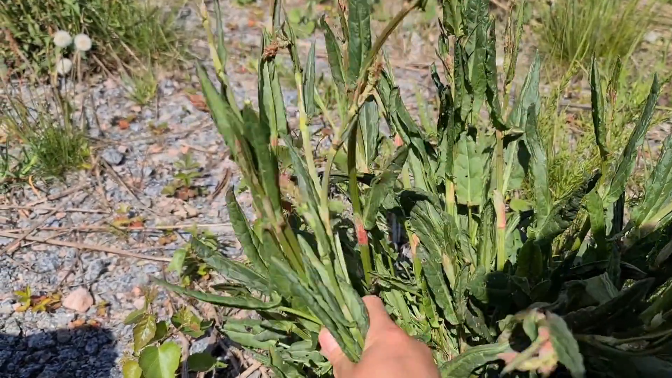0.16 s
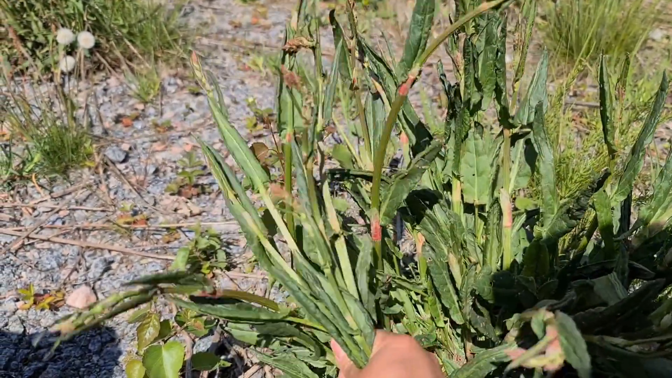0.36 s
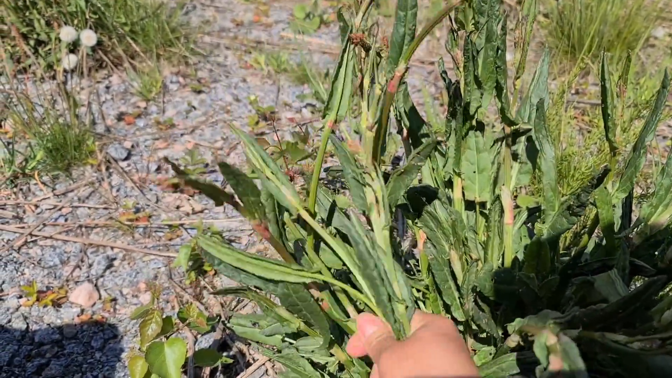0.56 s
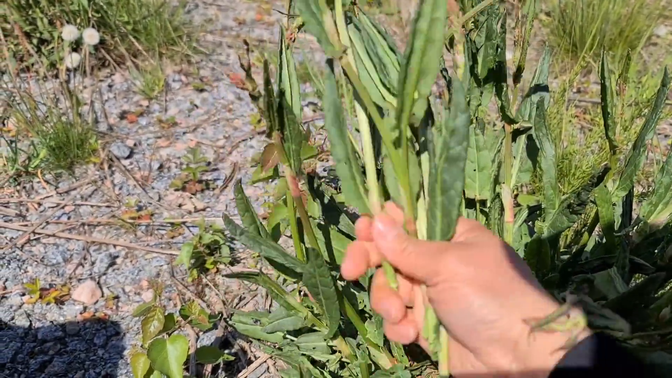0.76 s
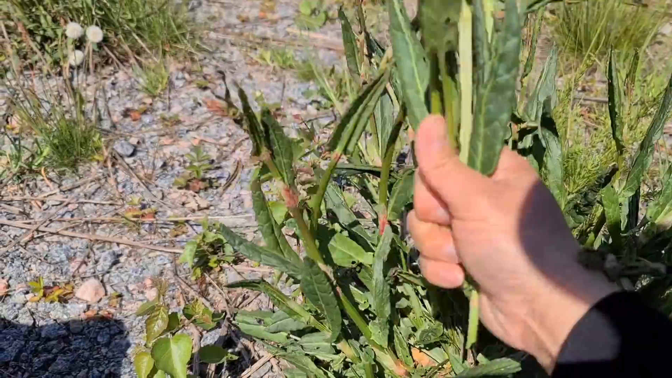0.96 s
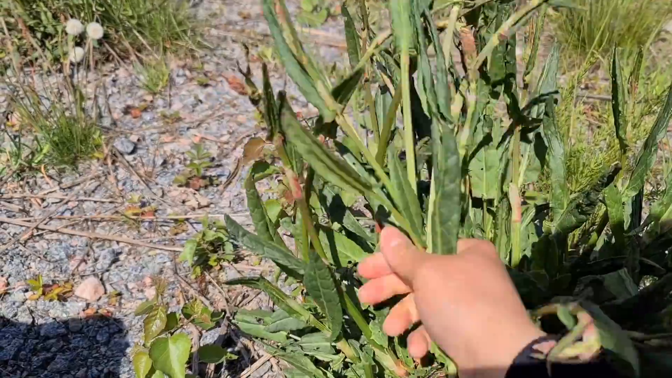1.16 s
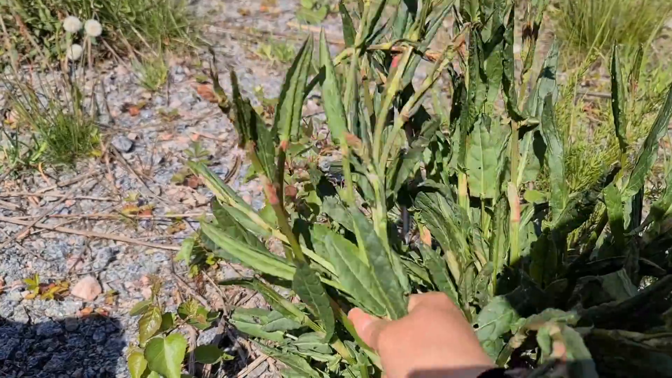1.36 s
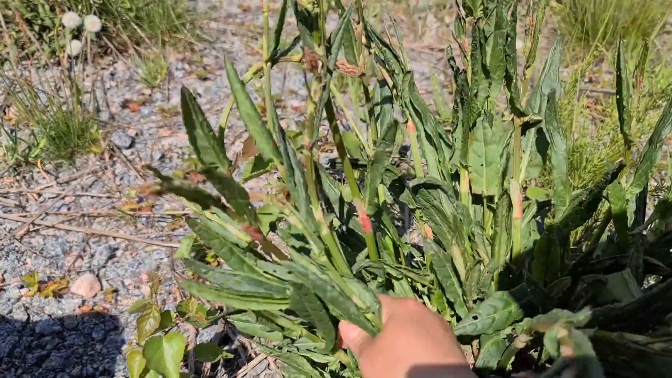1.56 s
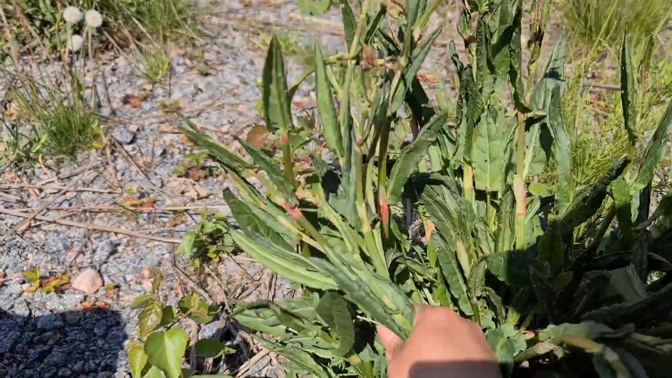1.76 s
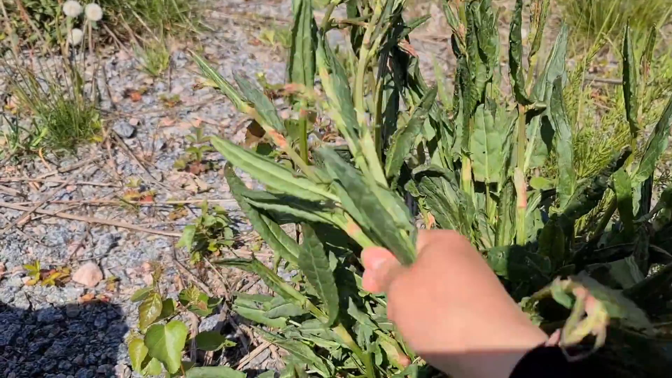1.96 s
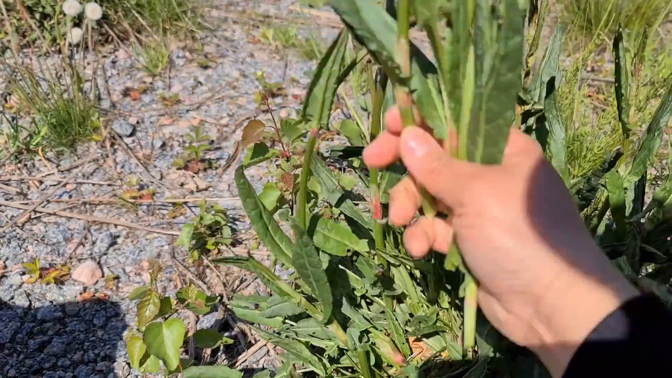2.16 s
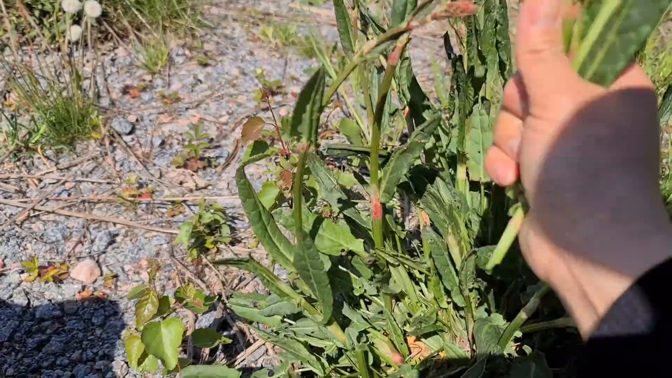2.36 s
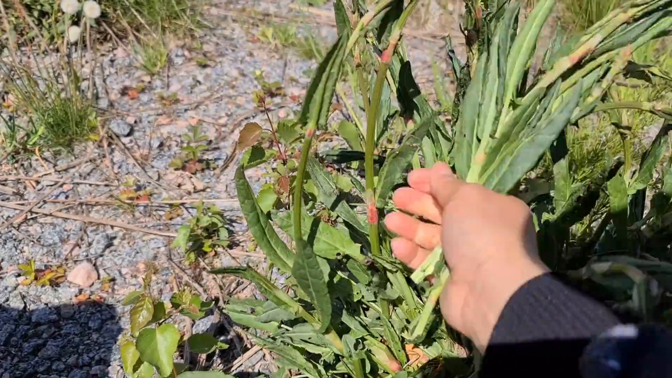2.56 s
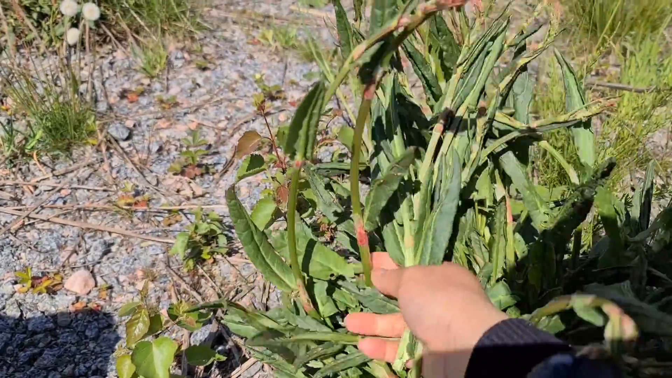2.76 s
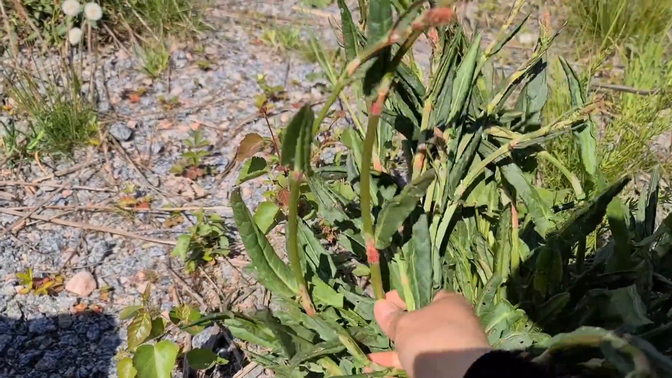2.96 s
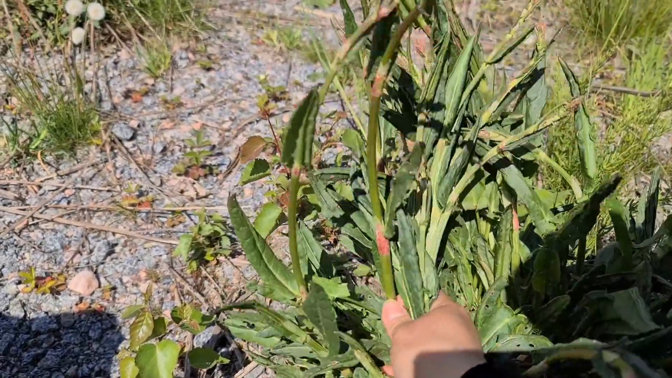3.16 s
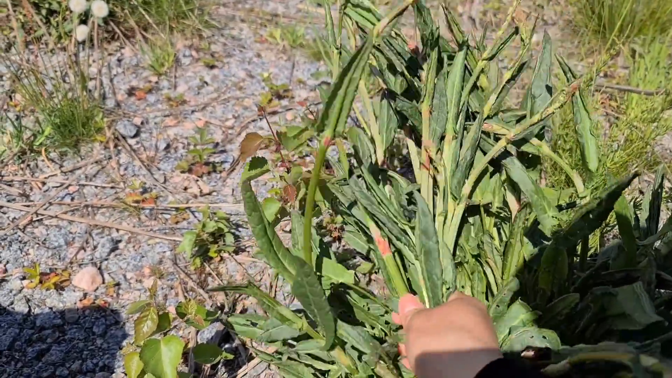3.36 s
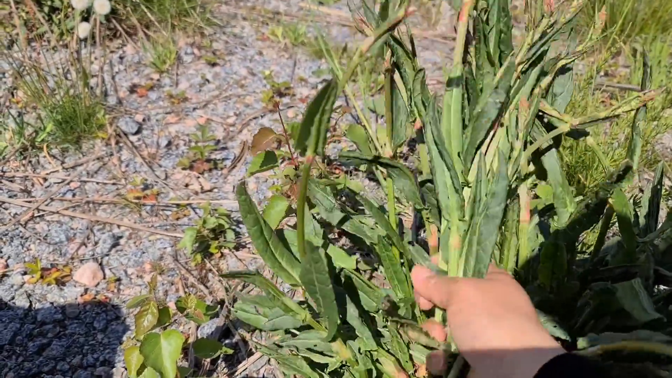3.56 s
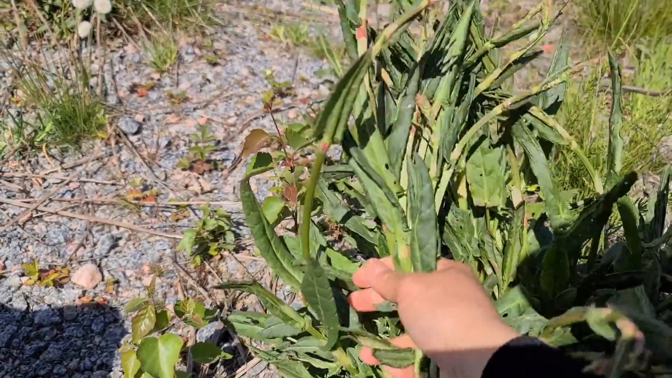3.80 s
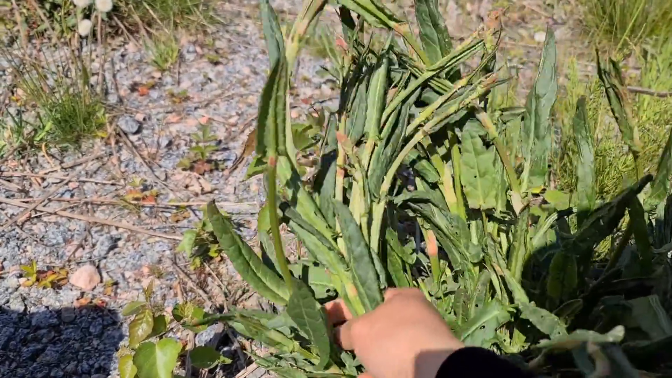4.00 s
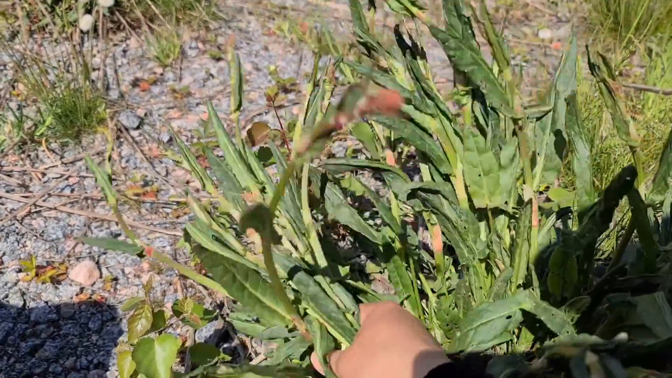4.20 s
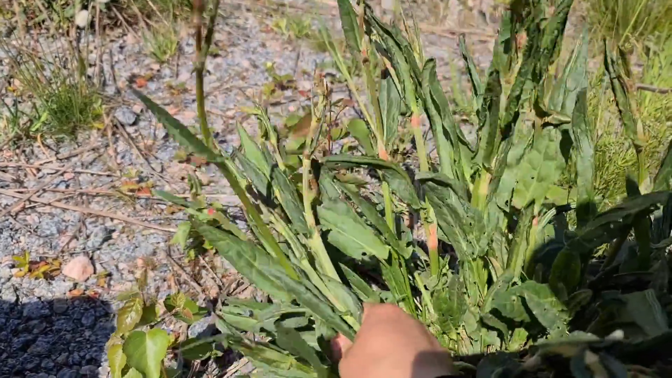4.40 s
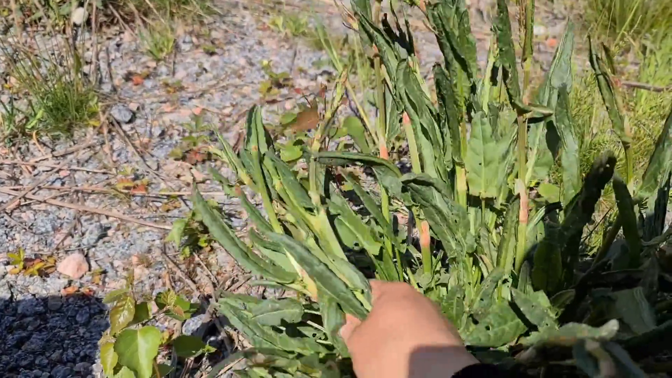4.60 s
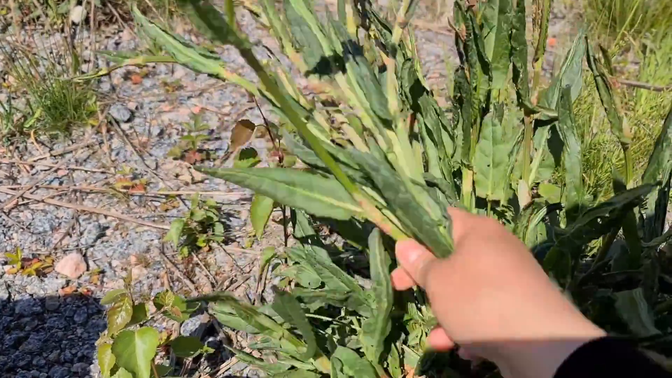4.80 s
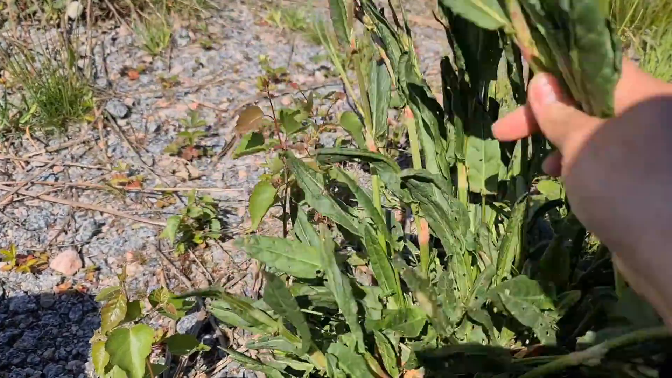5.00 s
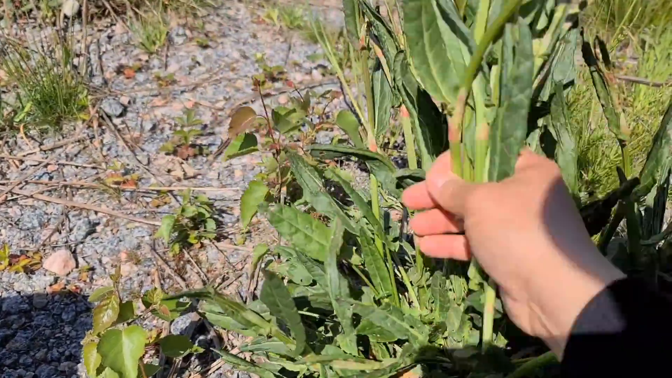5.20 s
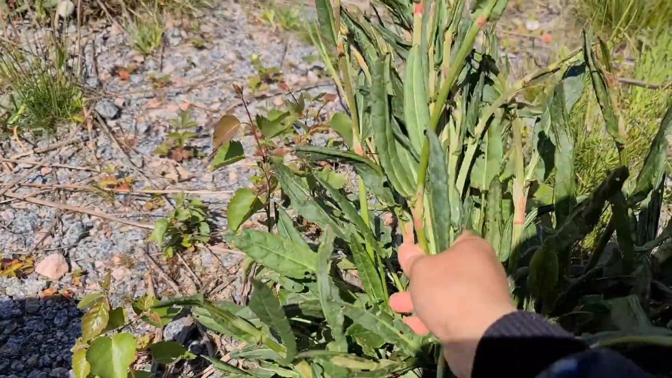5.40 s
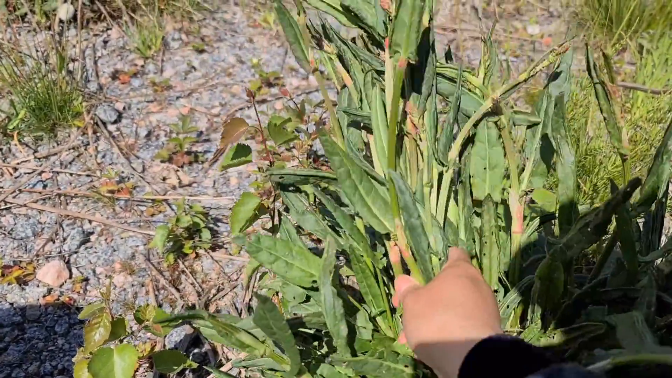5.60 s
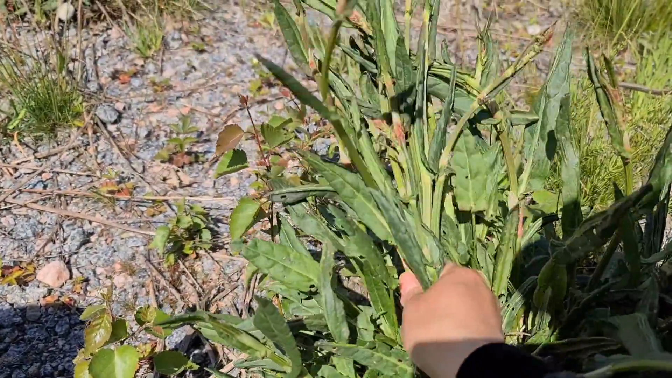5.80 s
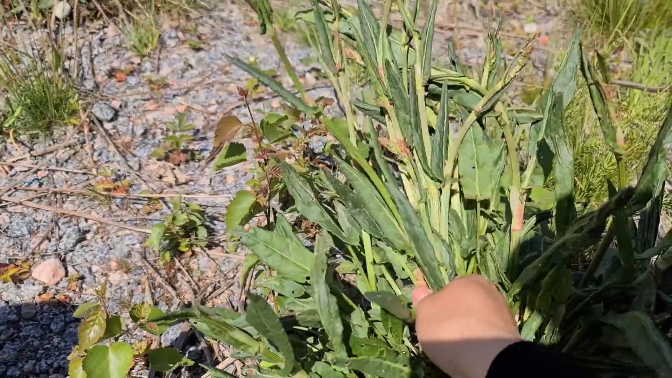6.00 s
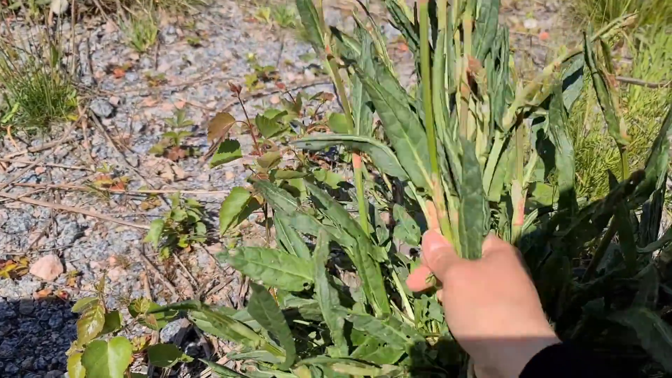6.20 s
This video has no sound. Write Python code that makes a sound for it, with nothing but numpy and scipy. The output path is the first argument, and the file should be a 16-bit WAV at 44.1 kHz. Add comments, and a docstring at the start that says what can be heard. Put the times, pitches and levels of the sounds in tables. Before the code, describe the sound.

Very close outdoors, a hand gathers long leafy stems and breaks them off. Each break is a sharp, wet pop with a brief fibrous crack, separated by soft dry rustling and tiny ticks. A small bird gives thin falling notes early and again late. Low distant traffic rumbles steadily behind, captured in stereo by a handheld phone.

```python
"""Far foliage hisses, traffic rumbles along the horizon and a bird's reverberation flickers, all filtered noise.
Close by, a hand stirs leaves: noise rubs and catches, and many brief gliding tones give it a grainy, tonal edge.
A small bird calls in near-sine slides. Leaf ribs flick as bright ticks; from about half a second on, juicy stems
break, each a short ringing pop with a thud and a noisy crack of fibres. Later single leaves rasp in narrow bands
of noise. All is heard through a phone with a microphone at each end."""
import sys
import numpy as np
from scipy import signal
from scipy.fft import rfft, irfft
from scipy.io import wavfile
from scipy.ndimage import uniform_filter1d

SR = 44100
rng = np.random.default_rng(int(sys.argv[2]) if len(sys.argv) > 2 else 0)


def log_audio(samples):
    """Write samples as a 16-bit WAV file to the path given in sys.argv[1]."""
    # one column per channel
    frames = np.atleast_2d(samples).T
    # limit to full scale, then quantise
    limited = np.clip(frames, -1, 1)
    pcm = np.round(limited * 32767).astype(np.int16)
    wavfile.write(sys.argv[1], SR, pcm)


N = 275625

# breaking stems: start_s, pop_peak_db (before thud and echoes), pop_pitch_hz, pop_t60_s (2 ms at least), thud_db,
# low_crack_db, low_crack_centre_hz, high_crack_db, high_crack_centre_hz, left_minus_right_db
STEM_BREAKS = [(0.4362, -37, 2180, 0.012, -44, -48, 3300, -42, 8800, -8),
               (0.4536, -9, 1900, 0.0047, -30.5, -20, 3060, -14, 11600, 0),
               (0.485, -40, 2080, 0.008, -50, -44, 4000, -43, 10500, 2.0),
               (1.363, -40, 1970, 0.016, -48, -48.5, 4500, -48.5, 8700, 3),
               (1.7859, -64, 1800, 0.0069, -65.5, -37.5, 4440, -29.5, 11100, 2),
               (1.8902, -6, 2820, 0.005, -32.5, -21.5, 3830, -23, 9900, 0.5),
               (2.8432, -4.5, 1178, 0.013, -13.5, -22.5, 1960, -48, 7900, -0.5),
               (2.8594, -43, 1690, 0.0096, -48, -67, 5000, -44.5, 10200, -1),
               (2.8934, -36.5, 1490, 0.005, -61, -54, 2860, -69, 9000, -1),
               (3.2896, -14, 2140, 0.0047, -28.5, -19.5, 6050, -14, 9000, 2.5),
               (3.3022, -43, 2000, 0.008, -64, -39, 4600, -39, 10500, -2),
               (3.676, -19.5, 1620, 0.0014, -55, -46.5, 3000, -70, 9900, 5),
               (4.2747, -19.5, 1900, 0.0071, -69, -68, 3020, -67, 11500, 5.5),
               (4.3244, -15, 1750, 0.0034, -43, -71, 3000, -68, 8680, -2),
               (4.3594, -12, 1935, 0.0064, -40, -38.5, 3100, -39.5, 9600, 5),
               (4.4672, -28.5, 1070, 0.026, -28, -20, 3130, -16.5, 10200, 7),
               (4.655, -41.5, 1870, 0.018, -53, -56, 5500, -41.5, 10600, 10),
               (5.389, -25, 1840, 0.0098, -71, -47.5, 3000, -54, 8450, 4),
               (5.399, -31.5, 1900, 0.012, -51, -62, 3010, -53, 11300, 6),
               (5.9977, -14.5, 1520, 0.0089, -32.5, -20.5, 5100, -23, 9600, 2),
               (6.0396, -34, 1520, 0.0074, -58, -47, 4000, -44, 11500, -1),
               (6.0615, -25.5, 2800, 0.0039, -53, -52, 4200, -49, 8640, 4),
               (6.123, -41, 2800, 0.0058, -63, -60, 4200, -55, 10000, 1)]
# spectrum of leaf noise, near and far: pitch_hz, relative_level_db (per Hz)
LEAF_SPECTRUM = [(2940, -44), (5000, -7), (7160, -6), (8280, -2), (8930, 1), (11400, -1), (12500, -4),
                 (15300, -7), (15800, -16), (16100, -39), (16500, -69)]


def undb(db):
    """Gain of a level in dB."""
    return 10 ** (np.asarray(db) / 20)


def level(x, db):
    """Scale to an rms level."""
    return x * undb(db) / np.sqrt(np.mean(x ** 2))


def curves(table):
    """Columns of a table drawn through every sample."""
    s, *columns = np.transpose(table)
    return [np.interp(np.arange(N) / SR, s, c) for c in columns]


def band(x, lo_hz, hi_hz, order=2):
    """Band-pass along time."""
    return signal.sosfilt(signal.butter(order, [lo_hz, min(hi_hz, SR / 2.2)], "band", fs=SR, output="sos"), x)


def colour(x, points):
    """Give noise the spectrum of (Hz, dB) points."""
    hz = np.fft.rfftfreq(N, 1 / SR) + 1
    points_hz, points_db = np.array(points).T
    db = np.interp(np.log(hz), np.log(points_hz), points_db)
    return irfft(rfft(x) * undb(db), N)


def walk(rate):
    """Random levels held 1 / rate s, slewed twice and scaled to a spread of 1."""
    hold = int(SR / rate)
    steps = np.repeat(rng.standard_normal(N // hold + 1), hold)
    v = uniform_filter1d(uniform_filter1d(steps, hold), hold)[:N]
    return v / v.std()


def add(out, sound, s, pan_db):
    """Lay a short sound into two channels; pan_db is left minus right."""
    i = int(s * SR)
    sound = sound[:, :N - i]
    out[:, i:i + sound.shape[1]] += sound * undb([[pan_db / 2], [-pan_db / 2]])


def traffic(spacing_m=0.18, sound_m_s=340):
    """Octave bands that waver alone; sound from all round the horizon sets how alike the two microphones are."""
    # rumble of the road: pitch_hz, relative_level_db (per Hz)
    rumble_spectrum = [(12, -75), (20, -27.5), (35, -19), (47, -3), (160, -2.5), (292, -11), (495, -10),
                       (636, -16.5), (1050, -19), (1870, -21.5), (2460, -31.5), (3410, -37.5),
                       (5360, -45.5), (6070, -50), (8000, -79), (10400, -82), (17600, -120)]
    # traffic drawing nearer and further: time_s, level_db (mean of both sides)
    swell = [(0.0, -42), (4.77, -44.5), (6.25, -44)]
    hz = np.fft.rfftfreq(N, 1 / SR) + 1
    bearing = np.linspace(0, np.pi, 24)[:, None]
    phase = 2 * np.pi * hz * spacing_m / sound_m_s * np.cos(bearing)
    alike = np.clip(np.mean(np.cos(phase), axis=0), -1, .94)
    mid, side = (rfft(colour(rng.standard_normal(N), rumble_spectrum)) * np.sqrt(1 + sign * alike)
                 for sign in (1, -1))
    left_right = np.array([mid + side, mid - side])
    out = 0
    for octave in range(4, 15):  # centred on 2 ** octave Hz
        share = np.clip(1 - np.abs(np.log2(hz) - octave), 0, 1)
        out = out + irfft(left_right * share, N) * undb(1.42 * walk(7.7) + 0.76 * walk(3.386))
    return level(out, 0) * undb(curves(swell)[0] + np.array([[.4], [-.4]]))


def air(rms_db=-69.5):
    """Gently drifting treble of far foliage, unrelated noise at the two microphones."""
    hiss = np.array([colour(v, LEAF_SPECTRUM) for v in rng.standard_normal((2, N))])
    return level(hiss, rms_db) * undb(1.2 * walk(1.6))


def reverberation():
    """Long blurred reverberation around the bird's calls: a flickering band of noise at their pitch."""
    # reverberation rising and sinking: time_s, level_db
    reverb_level = [(0.0, -59), (1.4, -66.5), (2.4, -78), (4.0, -67), (5.4, -68.5), (6.25, -71)]
    blur = band(rng.standard_normal((2, N)), 2500, 4500, order=3)
    blur = blur * undb(2.0 * np.array([walk(25), walk(25)]))
    return level(blur, 0) * undb(curves(reverb_level)[0])


def leaves(pan_db=1.0, grip_db=1.5):
    """Blades slide over skin and each other; every band of the hiss catches on its own."""
    hiss_gain, scrape_gain = strokes()
    hiss = 0
    for lo_hz, hi_hz in ((5000, 8500), (8500, 10500), (10500, 13000), (13000, 19000)):
        hiss = hiss + band(rub(120, 1.2, -1, 0.0012, 2.4), lo_hz, hi_hz)
    hiss = level(colour(hiss, LEAF_SPECTRUM), 0)
    hiss = hiss + undb(-21.0) * tonal_grains(6900, 13000, 0.0015, 5.6, count=900) + crackle()
    scrape = band(rub(290, 1.8, -1.0, 0.0047, 2.9), 3040, 6140)
    scrape = scrape + 1.84 * band(rub(140, 3.5, -1.4, 0.0013, 0.4), 2250, 3430)
    scrape = level(scrape, 1.03) + undb(-11.5) * tonal_grains(3210, 6130, 0.01, 2.0, count=500)
    # the grip is uneven, so all of the hiss flutters together
    hiss = hiss * hiss_gain * undb(grip_db * walk(55))
    return (hiss + scrape * scrape_gain) * undb([[pan_db / 2], [-pan_db / 2]])


def strokes(roundness=1.55, recoil_db=-36, recoil_s=0.011):
    """Gains of hiss and scrape: strokes and the shiver after each break add in power over a faint stir."""
    # leaves drawn through the hand or springing back:
    # start_s, length_s, loudest_at (share of length), peak_hiss_gain_db, scrape_minus_hiss_db
    hand_strokes = [(0.017, 0.11, 0.46, -58.5, 0), (0.255, 0.14, 0.82, -54.5, -1.5),
                    (0.363, 0.18, 0.43, -53, 2), (0.592, 0.095, 0.43, -57, -2.5),
                    (0.643, 0.18, 0.27, -56.5, -2.5), (0.838, 0.11, 0.66, -58.5, -4.5),
                    (0.957, 0.031, 0.7, -68, -8), (1.026, 0.31, 0.073, -58, -4.5),
                    (1.175, 0.42, 0.22, -61, 2.5), (1.29, 0.046, .5, -54, -17),
                    (1.697, 0.19, 0.35, -59.5, -4), (1.788, 0.021, 0.7, -47, -9),
                    (1.868, 0.098, 0.21, -50.5, -1), (1.946, 0.2, 0.88, -54.5, -9),
                    (2.135, 0.091, 0.66, -56, -24), (2.244, 0.092, 0.88, -65, 2),
                    (2.5, 0.42, 0.78, -60, -3), (2.885, 0.097, 0.56, -53.5, -11),
                    (3.265, 0.16, 0.2, -43, -7), (3.315, 0.044, 0.61, -36.5, -26),
                    (3.413, 0.11, 0.63, -50.5, -6), (3.527, 0.25, 0.45, -59.5, 0.5),
                    (4.015, 0.34, 0.44, -52.5, -2), (4.155, 0.097, 0.4, -45.5, -15),
                    (4.304, 0.22, 0.46, -61.5, 3.5), (4.44, 0.17, 0.098, -53, 1.5),
                    (4.602, 0.13, 0.45, -57, -4.5), (4.649, 0.018, .4, -42.5, -10),
                    (4.677, 0.17, 0.29, -52, -0.5), (4.795, 0.16, 0.39, -51, -2.5),
                    (4.889, 0.11, 0.66, -54.5, -2), (5.116, 0.064, 0.22, -61, 4),
                    (5.127, 0.24, 0.48, -61, 6.5), (5.301, 0.12, 0.19, -49.5, -3),
                    (5.348, 0.23, 0.56, -58.5, 4.5), (5.832, 0.22, 0.96, -57, -2),
                    (5.975, 0.13, 0.15, -47.5, 0.5), (6.088, 0.24, 0.25, -61.5, 0.5)]
    # between strokes hiss and scrape rest at these gains in dB, wandering together
    power = undb([[-78], [-71]] - 9 * walk(7.1)) ** 2
    for s, length, share, hiss_db, scrape_db in hand_strokes:
        samples = np.arange(int(length * SR))
        place = np.interp(samples / (length * SR), [0, np.clip(share, .05, .95), 1], [0, .5, 1])
        shape = np.abs(np.sin(np.pi * place)) ** roundness  # lower: flatter top, harder edges
        add(power, (shape * undb([[hiss_db], [hiss_db + scrape_db]])) ** 2, s, 0)
    # leaves shiver after a break, recoil_db from its high crack, the scrape 8 dB under the hiss
    fade = np.exp(-np.arange(int(10 * recoil_s * SR)) / (recoil_s * SR))
    for s, *_, high_db, _, _ in STEM_BREAKS:
        add(power, (fade * undb(high_db + recoil_db) * undb([[0], [-8]])) ** 2, s, 0)
    return np.sqrt(power)


def rub(ticks_per_s, scatter_db, tick_db, tick_s, patchy_db):
    """Sliding noise with short catches of ribs and hairs, different at each microphone."""
    ticks = (rng.random(N) < ticks_per_s / SR) * undb(scatter_db * rng.exponential(size=N))
    shape = np.arange(600) / (tick_s * SR)
    catches = signal.fftconvolve(ticks, shape * np.exp(-shape))[:N]
    noise = rng.standard_normal((4, N))
    return (noise[:2] + level(catches * noise[2:], tick_db)) * undb(patchy_db * walk(70))


def tonal_grains(lo_hz, hi_hz, length_s, scatter_db, count):
    """Many brief tones at random gliding pitches give the rustle a grainy, tonal edge."""
    out = np.zeros((2, N))
    u = np.linspace(0, 1, int(length_s * SR))
    for when, pitch, slide, size, side in rng.random((count, 5)):
        hz = lo_hz * (hi_hz / lo_hz) ** pitch * (1 + 0.2 * (slide - .5) * u)
        tone = np.sin(np.pi * u) ** 2 * np.sin(2 * np.pi * np.cumsum(hz) / SR)
        tone = tone * undb(-scatter_db * np.log(1 - size))  # a few stand out
        left_right = np.array([tone, -tone if slide > .5 else tone])
        add(out, left_right, when * N / SR, 12 * (side - .5))
    return level(out, 0)


def crackle(ticks_per_s=400, rms_db=-3, tick_s=.001):
    """Sparse uneven ticks of leaf edges, each a millisecond or so of the whole treble."""
    ticks = (rng.random(N) < ticks_per_s / SR) * undb(13.0 * rng.random(N) ** 2)
    shape = np.arange(400) / (tick_s * SR)
    bursts = signal.fftconvolve(ticks, shape * np.exp(-2 * shape))[:N] * rng.standard_normal((2, N))
    return level(colour(bursts, LEAF_SPECTRUM), rms_db)


def bird(rough=0.45, echo_db=3, fall_end_hz=2720, fall_hz_per_s=23000):
    """Near-sine slides that swell towards their end, roughened by moving air and blurred by scattered echoes."""
    # falling notes, two phrases of five: start_s, length_s, level_db (before roughness and echoes)
    falling = [(.032, 0.038, -63), (0.21, 0.036, -62.5), (0.405, 0.022, -63), (.553, .058, -62.5),
               (0.783, .019, -61), (4.412, .036, -60), (4.59, 0.036, -60), (4.787, 0.028, -60),
               (4.972, 0.033, -59), (5.175, 0.027, -62)]
    # rising notes around the first phrase: start_s, length_s, start_hz, end_hz, level_db (likewise)
    rising = [(.365, .02, 2846, 2870, -62), (0.81, 0.023, 2860, 3420, -62.5)]
    out = np.zeros((2, N))
    moving_air = 1 + rough * np.array([walk(300), walk(200)])
    # every fall drops at the same average rate onto one pitch
    falls = [(s, length, fall_end_hz + fall_hz_per_s * length, fall_end_hz, db) for s, length, db in falling]
    for s, length, start_hz, end_hz, db in falls + rising:
        u = np.linspace(0, 1, int(length * SR))
        hz = start_hz * (end_hz / start_hz) ** u
        note = np.sin(np.pi * u ** 1.2) * np.sin(2 * np.pi * np.cumsum(hz) / SR)
        add(out, level(np.array([note, note]), db), s, 0)
    t = np.arange(20000) / SR
    bushes = rng.standard_normal((2, len(t))) * (np.exp(-t / 0.031) + undb(-10) * np.exp(-t / .12))
    bushes = bushes / np.sqrt(np.sum(bushes ** 2))
    echoes = signal.fftconvolve(out, bushes, axes=1)[:, :N]
    return moving_air * out + undb(echo_db) * echoes


def flicks(length_s=0.0028):
    """A leaf rib flicks free: a thin bright tick of noise lasting a few milliseconds."""
    # ribs flicking free: middle_s, level_db
    rib_ticks = [(.29, -54), (.752, -42), (.88, -52), (.978, -52.5), (2.27, -52), (2.915, -49),
                 (4.738, -43), (4.865, -49), (4.968, -55), (5.635, -57.5)]
    out = np.zeros((2, N))
    for s, db in rib_ticks:
        tick = band(rng.standard_normal((2, 800)), 7400, 12700)[:, -int(length_s * SR):]
        add(out, level(tick * np.hanning(tick.shape[1]), db), s - length_s / 2, 0)
    return out


def snaps(rise_cycles=0.89, bounce_s=(0.0013, 0.0011), bounce_db=-9, shared=0.21, heard_s=0.0035):
    """A burst of the turgid stem rings it for a few cycles; tearing fibres spray a brief noisy crack."""
    scatter_s, scatter_db = .0007, -9  # echoes of a pop among the leaves
    tear_s, fizz_db, fizz_s = .00065, -15, .004  # rise of the tear, level and fade of the fizz behind it
    core_s, core_db = .0019, -6  # second tear, this late and this much weaker
    split_s = 0.0035  # the low crack dies away sooner
    late = 3  # samples by which the pop reaches the left microphone later
    out, t = np.zeros((2, N)), np.arange(1300) / SR
    brief = np.sqrt(heard_s * SR / len(t))  # thud and crack levels are rms as if packed into heard_s
    for s, pop_db, hz, t60, thud_db, low_db, low_hz, high_db, high_hz, pan_db in STEM_BREAKS:
        # the stem gives a little for half a cycle, then lets go
        swell = 1 - np.exp(-(t * hz / rise_cycles) ** 3)
        decay = np.exp(-np.log(1000) * t / max(t60, .002))
        second_mode = 0.092 * np.sin(2 * np.pi * 1.55 * hz * t)  # another way of bending
        ring = swell * decay * (-np.sin(2 * np.pi * hz * t) + second_mode)
        # soft flesh rounds the edges
        ring = signal.sosfilt(signal.butter(4, 2.2 * hz, fs=SR, output="sos"), ring)
        lead = int(SR / hz / 2)
        ring = ring * undb(pop_db) / np.abs(ring).max()
        # the halves spring apart: one slow swing of pressure under the pop
        swing = (t / .0005) ** 2 * np.exp(-t / 0.00028) * np.sin(2 * np.pi * 780 * t)
        boom = t * np.exp(-t / 0.0009) * np.sin(2 * np.pi * 470 * t)  # of the whole bunch
        thud = level(swing, 0) + level(boom, -3.0)
        thud = band(thud, 190, 2300)  # too small a thing to push deep bass
        ring = ring + np.roll(level(thud, thud_db), lead) * brief
        # the ground sends a weaker copy just after
        ring = np.array([ring + undb(bounce_db) * np.roll(ring, int(b * SR)) for b in bounce_s])
        # nearby leaves scatter more, differently to each microphone
        foliage = rng.standard_normal((2, 300)) * t[:300] * np.exp(-t[:300] / scatter_s)
        scattered = level(signal.fftconvolve(ring, foliage, axes=1)[:, :len(t)], scatter_db)
        ring = ring + scattered * np.sqrt(np.mean(ring ** 2))
        # the skin tears, the core follows, and loose strands fizz on behind
        u = t / tear_s
        skin = u * np.exp(1 - u)
        core = undb(core_db) * np.roll(skin, int(core_s * SR))
        fizz = undb(fizz_db) * np.minimum(u, 1) * np.exp(-t / fizz_s)
        fibres = rng.standard_normal((3, len(t))) * (skin + core + fizz)
        fibres = shared * fibres[0] + fibres[1:]  # partly alike at both microphones
        low_fibres = fibres * (np.exp(-t / split_s) + .06)
        low_crack = level(band(low_fibres, low_hz / 1.61, low_hz * 1.465, order=3), low_db)
        high_crack = level(band(fibres, high_hz / 1.29, high_hz * 1.194), high_db)
        add(out, np.array([np.roll(ring[0], late), ring[1]]), s - lead / SR, pan_db)
        add(out, (low_crack + high_crack) * brief, s, pan_db)
    return out


def rasps():
    """A blade chatters in one narrow band of noise while it drags past a finger."""
    # single leaves dragging: start_s, length_s, centre_hz, level_db
    drags = [(2.298, 0.036, 4300, -59), (5.214, 0.017, 4100, -53), (5.247, 0.021, 4850, -52.5),
             (5.324, 0.039, 4650, -50), (5.455, 0.012, 5540, -52), (5.472, .008, 5040, -54)]
    out = np.zeros((2, N))
    for s, length, hz, db in drags:
        rasp = band(rng.standard_normal((2, 2000)), hz / 1.07, hz * 1.02)[:, -int(length * SR):]
        add(out, level(rasp * np.hanning(rasp.shape[1]), db), s, 0)
    return out


def scene():
    """Everything that reaches the two microphones."""
    background = traffic() + air() + reverberation()
    return background + leaves() + bird() + flicks() + snaps() + rasps()


def record(dry, top_hz=16300):
    """The phone clips just under full scale, then a steep low-pass cuts the top."""
    clipped = np.clip(dry, -.98, .98)
    return signal.sosfilt(signal.ellip(8, .2, 70, top_hz, fs=SR, output="sos"), clipped)


dry = scene()
out = record(dry)
log_audio(out)
```